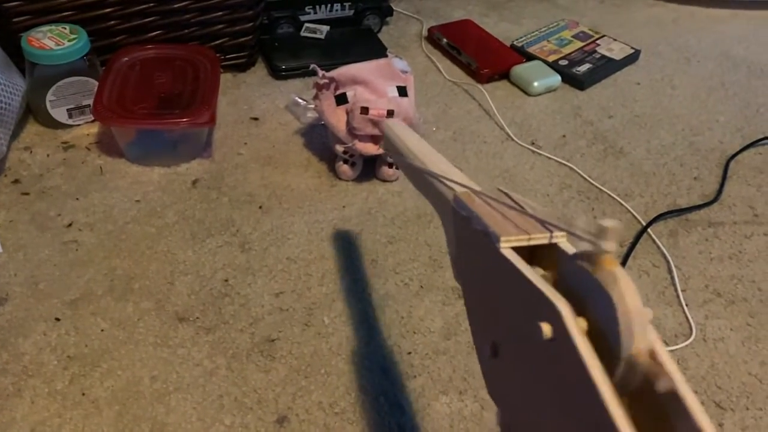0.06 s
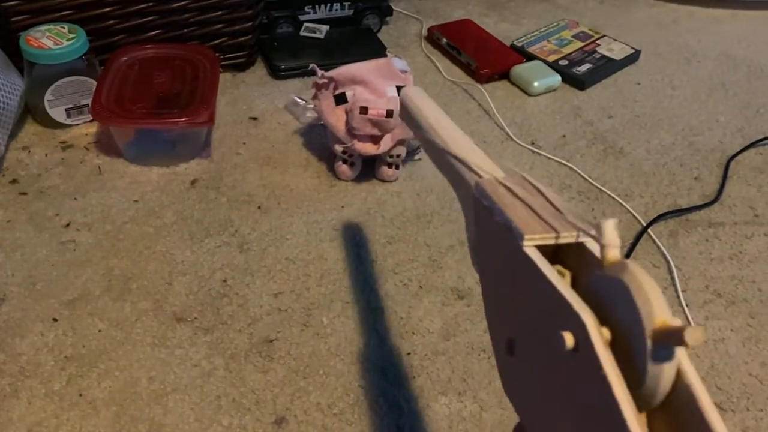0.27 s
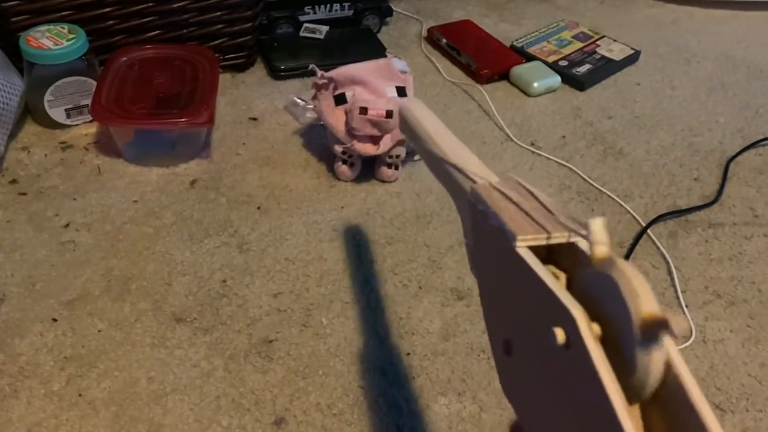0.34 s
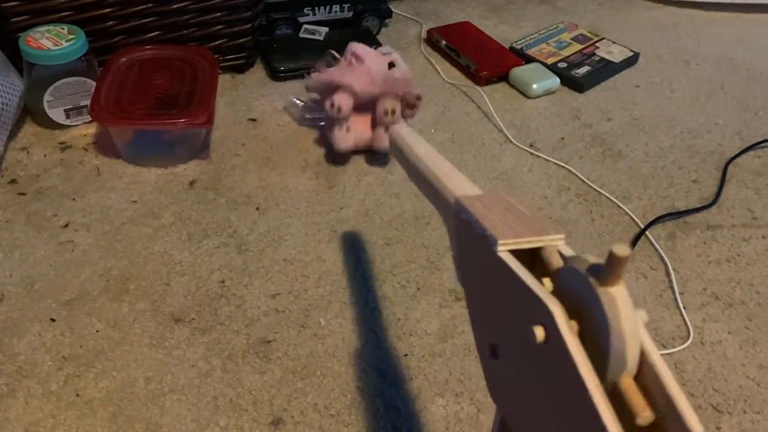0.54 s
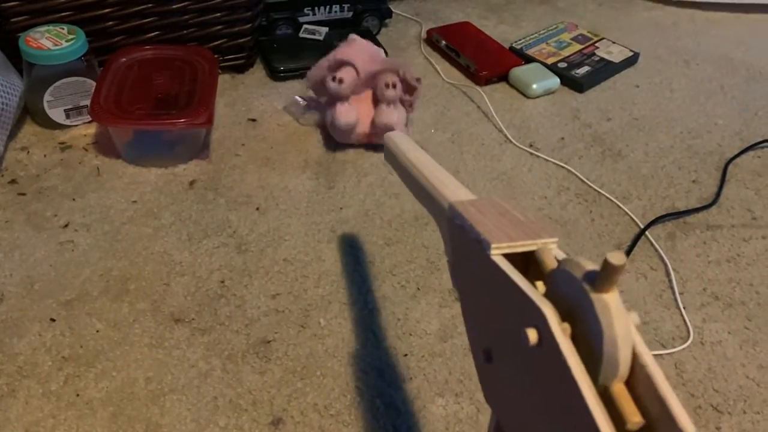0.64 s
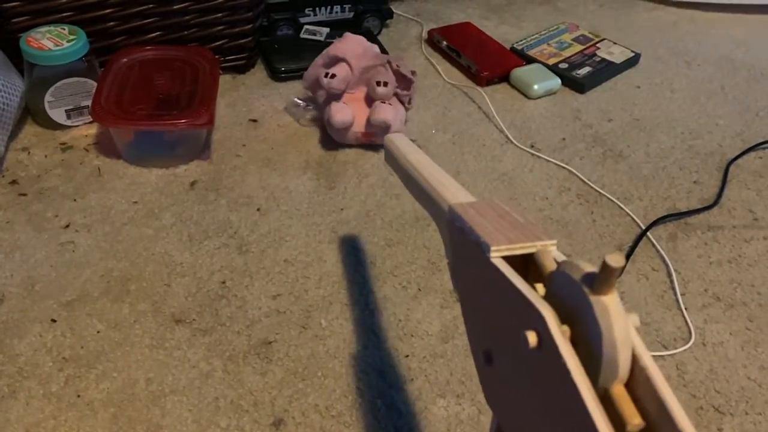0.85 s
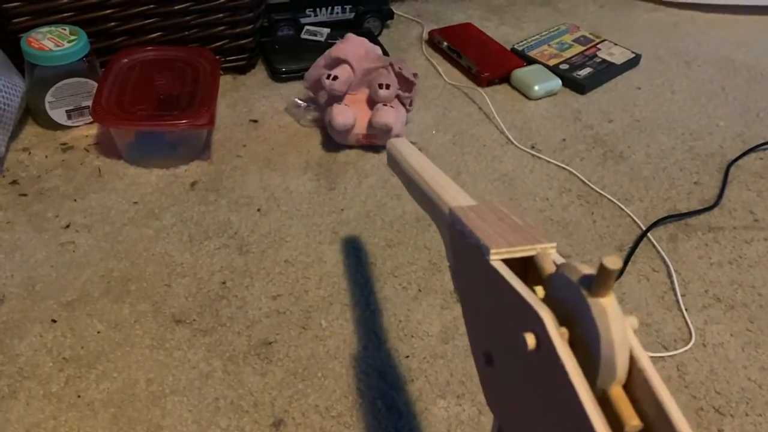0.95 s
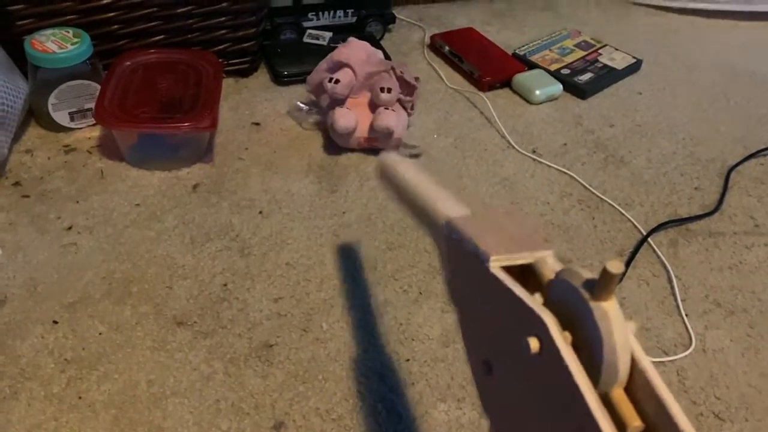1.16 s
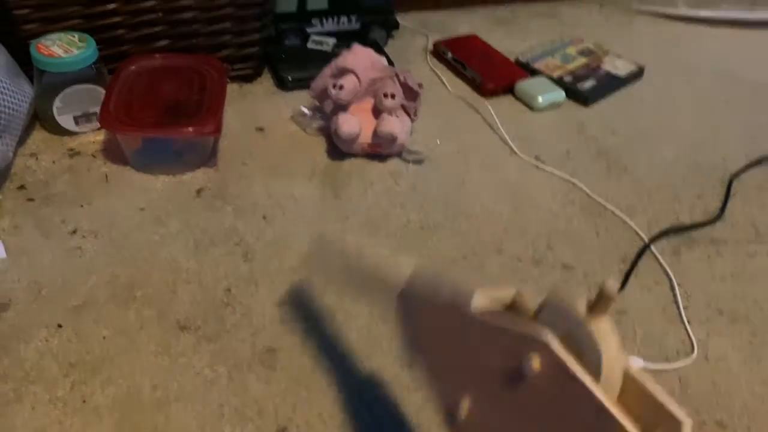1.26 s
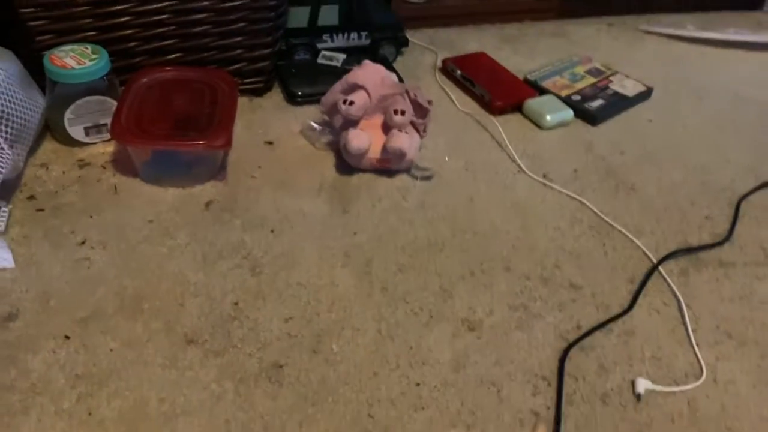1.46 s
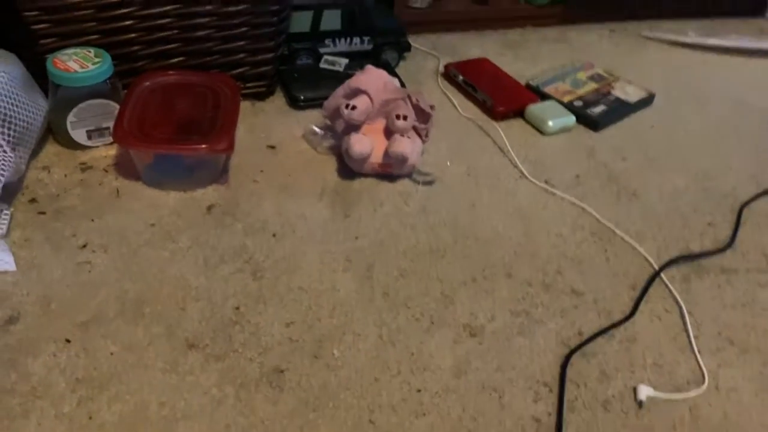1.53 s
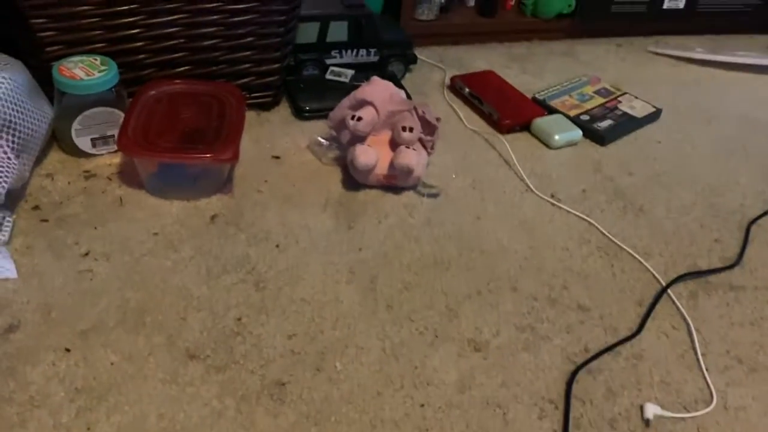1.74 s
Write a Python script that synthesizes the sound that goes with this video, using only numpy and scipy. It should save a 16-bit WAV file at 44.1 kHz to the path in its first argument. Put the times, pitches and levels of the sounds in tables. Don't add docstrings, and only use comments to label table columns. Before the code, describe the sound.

A wooden rubber band gun fires twice in quick succession, each a crisp woody snap with a tiny rattle, the second softly thumping a plush toy; later faint knocks as it is set down in a quiet carpeted room.

```python
import sys
import numpy as np
from scipy import signal
from scipy.fft import rfft, irfft
from scipy.io import wavfile

SR = 44100
rng = np.random.default_rng(int(sys.argv[2]) if len(sys.argv) > 2 else 0)


def level_to_linear(level):
    exponent = np.asarray(level, float) / 20
    return 10 ** exponent


def digitize_waveform(pressure):
    field = np.atleast_2d(pressure).T
    bounded = np.clip(field, -1, 1)
    quanta = np.round(bounded * 32767).astype(np.int16)
    wavfile.write(sys.argv[1], SR, quanta)


N = 79380

# (time [s], peak level [dB], strongest frequency [Hz], fall away from it [dB/octave], contact length [ms])
GUN_CONTACTS = [(.0693, -49.5, 1230, 9, 1.5), (.1301, -10, 8940, 8, .8), (.1305, -19, 6000, 9, 0.87),
                (.1309, -12.5, 3800, 5, 2.2), (.1308, -8, 1500, 7.5, 2.4), (.1428, -25.5, 3260, 7, 0.9),
                (.148, -32.5, 4200, 7.5, 2.5), (.164, -38.5, 1600, 2, 1.5), (.171, -39, 3014, 14, 1.5),
                (.4185, -30, 5000, -10.5, 2.5), (.4285, -29.5, 1400, 4.5, 4.7),
                (.4372, -27, 4200, -3.5, 0.89), (.4454, -12, 1600, 2.5, 0.81), (.4485, -25.5, 2800, 5, 8.2),
                (.4785, -33.5, 9000, 4.5, 1.5), (.483, -28.5, 7623, 5.5, 1.6),
                (.6515, -50.5, 3560, -19, 1.1), (.662, -74, 3300, 6, 1.5)]
# (frequency [Hz], level [dB], t60 [s])
GUN_MODES = [(380, -26, .008), (796, -17, .01), (1117, -6.5, 0.027), (1379.7, -6.5, .028),
             (1576, -2.5, 0.032), (2000, -10, 0.014), (2690, -5.5, 0.014), (3240, -4, 0.019),
             (3613, -5.5, 0.013), (4390, -1, 0.013), (5920, -1, 0.0052), (7400, -15.5, 0.012),
             (9110, -3, 0.0045), (14800, -16, .003)]
# (time [s], peak level [dB], strongest frequency
# [Hz], fall [dB/octave], length [ms])
BOX_CONTACTS = [
    (.001, -63.5, 600, 2, 2.5),
    (1.231, -71.5, 1900, 0.5, 1.82),
    (1.372, -70, 1200, -1, 1.8),
    (1.4615, -44, 3760, 5, 4),
    (1.466, -41.5, 1500, -1.5, 5),
    (1.5185, -44, 700, 7.5, 2.35),
    (1.5425, -51.5, 2980, .6, 4.8),
    (1.668, -64.5, 1413, 12, 9.8),
]
# (frequency [Hz], level [dB], t60 [s])
BOX_MODES = [(313, -7, 0.024), (500, -4, 0.01), (811, 1.5, 0.023), (1012, -3.5, 0.021), (1290, -8, 0.023),
             (1600, -3.5, 0.0069), (2148, -1.5, 0.02), (2440, -6, 0.019), (2853, -6.5, .02),
             (3840, -2, 0.011), (4634, -20.5, 0.02), (6840, -12.5, .01), (10800, -16, 0.0055)]
# (time [s], level [dB])
BAND_CREEP_1 = [(.07, -77.5), (.092, -60), (.1, -51), (.128, -43), (.135, -45.5), (.18, -52.5),
                (.26, -67.5), (.36, -85)]
# (time [s], level [dB])
BAND_CREEP_2 = [(.37, -85.5), (.405, -56.5), (.425, -47), (.444, -27.5), (.46, -43.5), (.49, -54),
                (.55, -76), (.62, -135)]
# (time [s], level [dB])
HAND_RUB = [(1.2, -100), (1.33, -84.5), (1.45, -84.5), (1.49, -69), (1.6, -86), (1.63, -73.5), (1.7, -71),
            (1.75, -63), (1.8, -62)]
# (frequency [Hz], level [dB], t60 [s])
CREAK_MODES = [(995, -12, 0.016), (1390, -1, .04), (1550, -5, 0.011), (2910, -15.5, .012)]
# (time [s], level [dB])
BAND_SKID = [(.134, -59.5), (.145, -46), (.2, -57), (.3, -69.5), (.375, -82), (.39, -100)]
# (time [s], level [dB])
SLEEVE_RUSTLE = [(1.27, -100), (1.3, -82.5), (1.4, -89), (1.46, -79), (1.56, -81.5), (1.6, -97)]
# (low [Hz], high [Hz])
RUSTLE_BAND_HZ = [2300, 5600]
# (time [s], peak level [dB], start frequency [Hz], length [ms])
SOFT_THUMPS = [
    (.134, -46.5, 130, 9),
    (.4475, -26.5, 802, 3.6),
    (0.4509, -24.5, 434, 6),
    (0.464, -39.5, 112, 18),
    (1.504, -50.5, 138, 11),
    (1.721, -52, 154, 18),
]
# (centre [Hz], level [dB], t60 [s])
ROOM_BANDS = [(258, -20.5, .2), (504, -16, .2), (1020, -9, 0.28), (2160, -5.86, 0.26), (4000, -8.1, 0.23),
              (7300, -6.5, 0.28), (12100, -14.5, .15)]
# (frequency [Hz], level [dB])
RUMBLE_SPECTRUM = [(12, -39.5), (20, -14.5), (53, 0.5), (127, -8), (248, -19), (285, -22.5), (446, -30.5),
                   (678, -38), (16000, -59)]
# (frequency [Hz], width [Hz])
PORT_TURNS = [(9000, 1100), (13200, 1900)]
# (low [Hz], high [Hz])
OPPOSED_BANDS = [(8400, 9600), (12700, 13900)]


def knocks(contacts, modes):
    lag_cycles, crack_db, clump_fall_db = 0.9, -18.5, 8
    start_s, peak_db, centre_hz, fall_db, length_ms = np.transpose(contacts)
    when = rng.random((len(start_s), 5))
    when[:, 0] = 0
    size = rng.normal(0, 1, (len(start_s), len(modes), 5))
    ringing = 0
    for k, (hz, level_db, t60_s) in enumerate(modes):
        time_s = start_s[:, None] + when * length_ms[:, None] / 1000 + lag_cycles / hz
        at = (time_s * SR).astype(int)
        off_centre_db = np.abs(fall_db * np.log2(hz / centre_hz))
        mode_db = peak_db + level_db - off_centre_db + 2.5 + 1.5 * size[:, k, 0]
        share = level_to_linear(1.6 * size[:, k] - clump_fall_db * when)
        total = np.abs(np.sum(share * np.exp(2j * np.pi * hz * at / SR), axis=1)) + 0.5
        clicks = np.zeros(N + SR)
        np.add.at(clicks, at, share * (level_to_linear(mode_db) / total)[:, None] * (-1) ** k)
        ringing = ringing + spread(ring(clicks, hz, t60_s)[:N], hz, (-1) ** (k // 3))
    t = np.arange(N) / SR
    crack_env = 0
    for s, db, hz, fall, ms in contacts:
        decay = (t > s) * np.exp(-np.maximum(t - s, 0) / (ms * 6e-4))
        crack_env = crack_env + level_to_linear(db + crack_db - abs(fall * np.log2(8000 / hz))) * decay
    return cut(ringing, 150, "high") + crack_env * cut(rng.standard_normal(N), 2500, "high")


def rubbing():
    slips_per_s, tilt_db_per_octave = 6000, -7
    creak_db, hiss_db = -4, -5.5
    body = 0
    for hz, level_db, t60_s in GUN_MODES:
        slips = (rng.random(N) < slips_per_s / len(GUN_MODES) / SR).astype(float)
        slips *= level_to_linear(3 * np.minimum(rng.exponential(1, N), 4)) * rng.choice([-1, 1], N)
        mode_db = level_db + tilt_db_per_octave * np.log2(hz / 2000)
        body = body + level_to_linear(mode_db) * ring(slips, hz, t60_s * 0.27)
    hiss = cut(rng.standard_normal(N), [500, 6000], "band", order=1)
    creak = 0
    for hz, db, t60_s in CREAK_MODES:
        creak = creak + level_to_linear(db) * spread(ring(rng.standard_normal(N), hz, t60_s), hz, 2.4)
    strokes = curve(BAND_CREEP_1) + curve(BAND_CREEP_2) + curve(HAND_RUB)
    texture = rms_one(cut(body, 880, "high"))
    texture = texture + level_to_linear(creak_db) * rms_one(creak) + level_to_linear(hiss_db) * rms_one(hiss)
    return strokes * texture


def rustle():
    grain_db = 2.5 * np.minimum(rng.exponential(1, N // 64 + 1), 3)
    grains = rng.standard_normal(N) * level_to_linear(grain_db.repeat(64)[:N])
    return (curve(BAND_SKID) + curve(SLEEVE_RUSTLE)) * rms_one(cut(grains, RUSTLE_BAND_HZ, "band"))


def thumps():
    end_pitch = 0.55
    t = np.arange(N) / SR
    out = 0
    for s, db, hz, ms in SOFT_THUMPS:
        u = np.clip((t - s) / (ms / 1000), 0, 8)
        cycles = hz * ms / 1000 * (end_pitch * u + (1 - end_pitch) * (1 - np.exp(-u)))
        push = 2 * np.e * u * np.exp(-2 * u)
        out = out + level_to_linear(db) * push * np.sin(2 * np.pi * cycles)
    return out


def room(x):
    build_s, apart_db, apart_top_hz = 0.0028, 3, 5000
    t = np.arange(SR // 2) / SR
    white = rng.standard_normal((2, SR // 2))
    echoes = 0
    for hz, db, t60_s in ROOM_BANDS:
        echoes = echoes + level_to_linear(db - 60 * t / t60_s) * cut(white, [hz / 1.21, hz * 1.225], "band", order=1)
    mid, side = echoes * (1 - np.exp(-t / build_s))
    side = level_to_linear(apart_db) * cut(side, apart_top_hz, "low", order=5)
    return signal.fftconvolve(np.array([mid + side, mid - side]), x[None], axes=1)[:, :N]


def household():
    rumble_db, alike_below_hz = -62, 700
    hum_hz, hum_width_hz, hum_db = 119, 18, -62.5
    hz = np.maximum(np.fft.rfftfreq(N, 1 / SR), 1)
    row_hz, row_db = np.transpose(RUMBLE_SPECTRUM)
    colour = level_to_linear(np.interp(np.log(hz), np.log(row_hz), row_db))
    mid, side = rfft(rng.standard_normal((2, N)))
    apart = np.sqrt(0.057 + 0.97 / (1 + (alike_below_hz / hz) ** 2))
    floor = irfft(colour * (mid + apart * side * [[1], [-1]]), N)
    hum = ring(rng.standard_normal(N + SR), hum_hz, 2.2 / hum_width_hz)[SR:]
    return level_to_linear(rumble_db) * floor / np.std(floor.mean(0)) + level_to_linear(hum_db) * rms_one(hum)


def ring(clicks, hz, t60_s):
    r, w = level_to_linear(-60 / (t60_s * SR)), 2 * np.pi * hz / SR
    return signal.lfilter([0, np.sin(w)], [1, -2 * r * np.cos(w), r * r], clicks + 1e-18)


def spread(tone, hz, sign):
    spread_rad, top_hz = 0.49, 4500
    turn = sign * spread_rad / (1 + (hz / top_hz) ** 4)
    quadrature = np.gradient(tone) * SR / (2 * np.pi * hz)
    return tone + turn * quadrature * np.array([[1], [-1]])


def curve(rows):
    s, db = np.transpose(rows)
    return level_to_linear(np.interp(np.arange(N) / SR, s, db, left=-140, right=-140))


def rms_one(x):
    return x / np.sqrt(np.mean(x ** 2) + 1e-20)


def cut(x, hz, kind, order=2):
    return signal.sosfilt(signal.butter(order, hz, kind, fs=SR, output="sos"), x)


def scene():
    room_db = -38
    near = knocks(GUN_CONTACTS, GUN_MODES) + knocks(BOX_CONTACTS, BOX_MODES)
    near = near + rubbing() + rustle() + thumps()
    return near + level_to_linear(room_db) * room(near.mean(axis=0)) + household()


def top_cut(x):
    return signal.sosfilt(signal.butter(12, 16640, fs=SR, output="sos"), x)


def record(dry):
    lift_hz, lift_db = 3800, 4
    low_hz, top_hz = 38, 16200
    peak = signal.lfilter(*signal.iirpeak(lift_hz, 1.1, fs=SR), dry[0])
    left = dry[0] + (level_to_linear(lift_db) - 1) * peak
    for hz, width_hz in PORT_TURNS:
        r, c = np.exp(-np.pi * width_hz / SR), np.cos(2 * np.pi * hz / SR)
        left = signal.lfilter([r * r, -2 * r * c, 1], [1, -2 * r * c, r * r], left)
    mid, side = (left + dry[1]) / 2, (left - dry[1]) / 2
    hz = np.fft.rfftfreq(N, 1 / SR)
    for band in OPPOSED_BANDS:
        gain = np.clip(np.abs(hz - np.mean(band)) / np.ptp(band) * 4 - 1.5, 0.1, 1)
        mid = irfft(rfft(mid) * gain, N)
    ports = cut(np.array([mid + side, mid - side]), low_hz, "high")
    mix = cut(ports, top_hz, "low", order=12)
    return top_cut(mix)


dry = scene()
out = record(dry)
digitize_waveform(out)
```